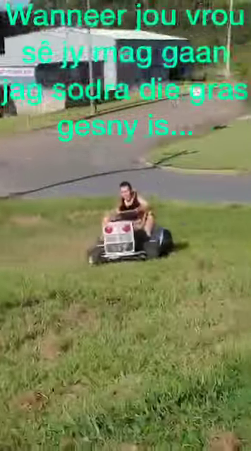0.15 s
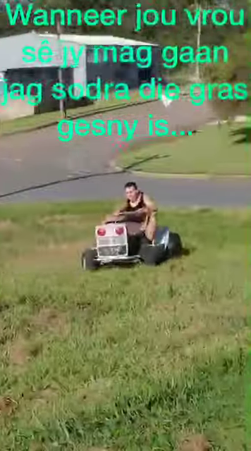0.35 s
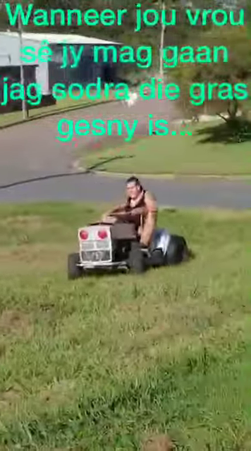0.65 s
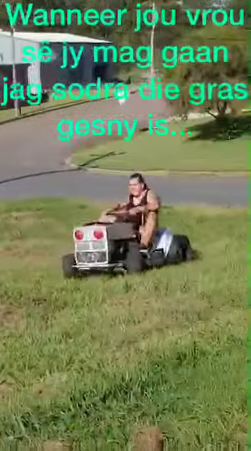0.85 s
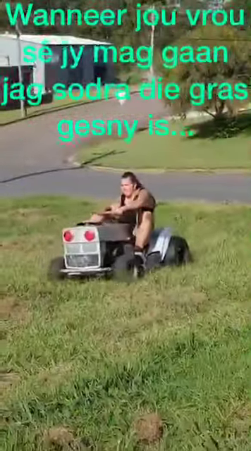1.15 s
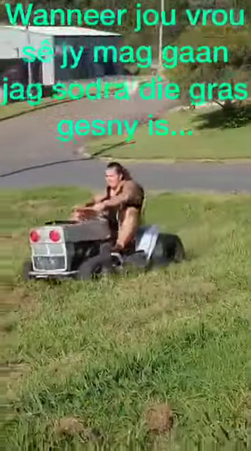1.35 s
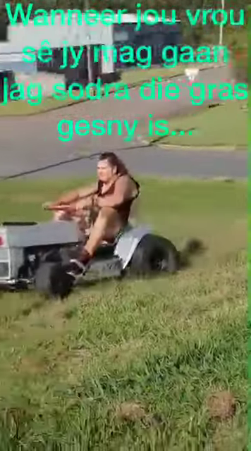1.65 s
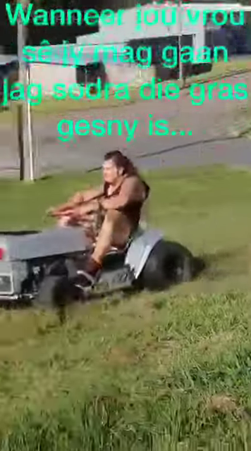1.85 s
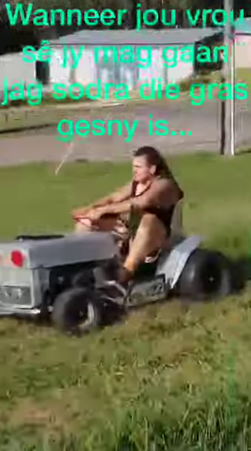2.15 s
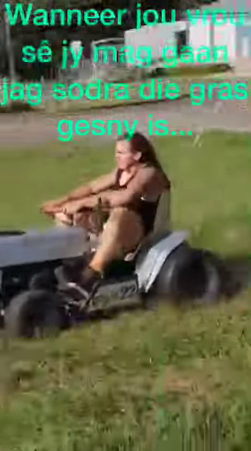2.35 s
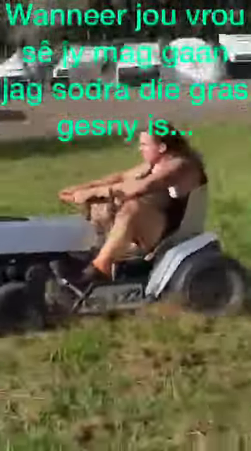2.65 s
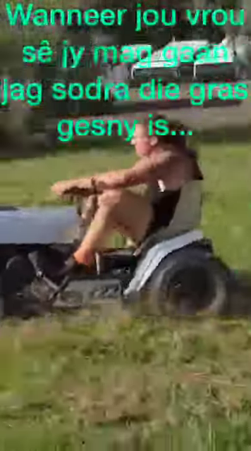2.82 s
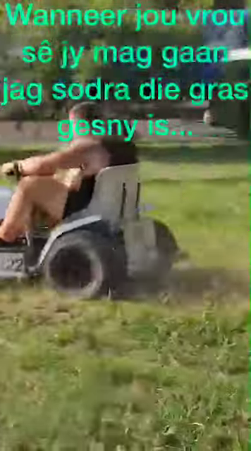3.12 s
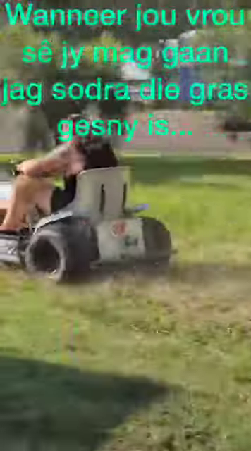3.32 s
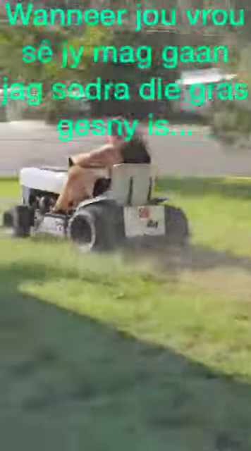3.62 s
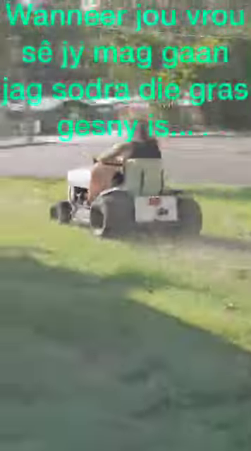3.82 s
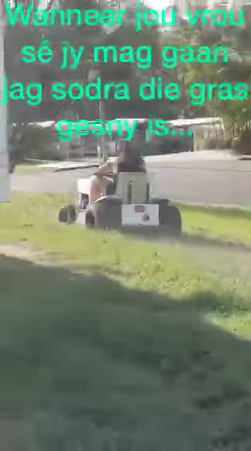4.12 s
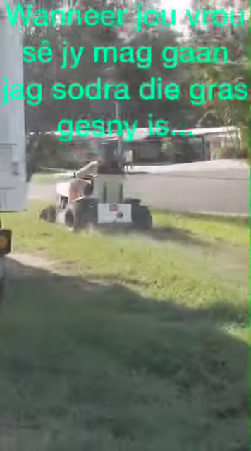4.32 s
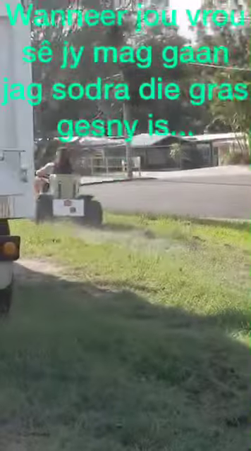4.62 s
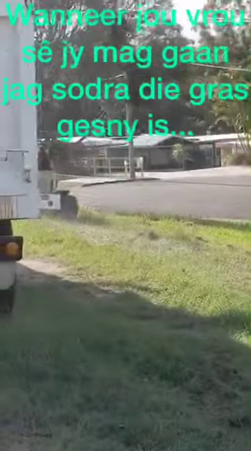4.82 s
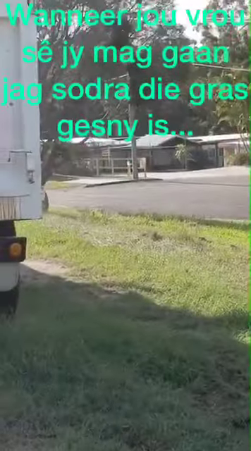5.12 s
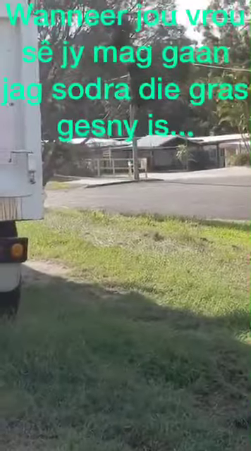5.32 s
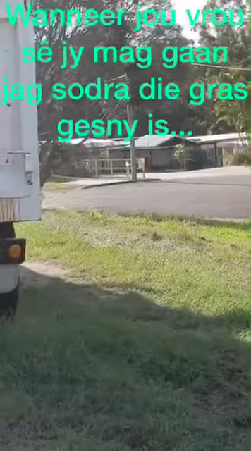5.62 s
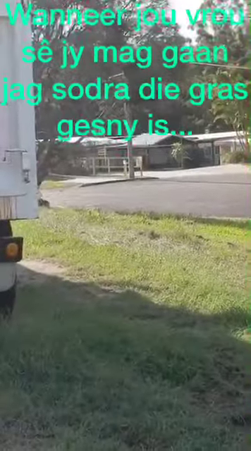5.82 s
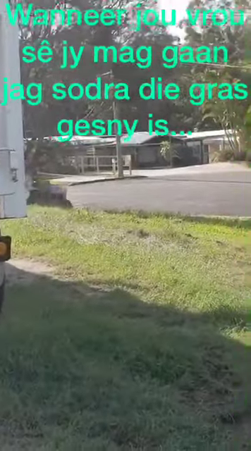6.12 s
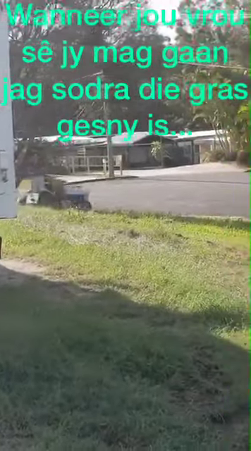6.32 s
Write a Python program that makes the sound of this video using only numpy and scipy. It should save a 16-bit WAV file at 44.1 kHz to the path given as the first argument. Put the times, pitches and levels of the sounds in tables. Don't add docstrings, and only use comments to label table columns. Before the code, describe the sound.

A buzzing, barking small engine races beyond a parked truck, muffled and echo-scattered, briefly clearer and crackling near the middle. Popping misfires mark each throttle change. After the second pull it falls to a lower stuttering drone and recedes, leaving faint yard murmur, two tiny snaps, gliding high bird chirps and a stronger final gust on the handheld microphone.

```python
import sys
import numpy as np
from scipy import signal
from scipy.io import wavfile
from scipy.ndimage import uniform_filter1d

SR = 44100
rng = np.random.default_rng(int(sys.argv[2]) if len(sys.argv) > 2 else 0)


def amplitude_ratio(level_db):
    exponent = np.asarray(level_db, float) / 20
    return 10 ** exponent


def waveform_to_disk(signal):
    frames = np.transpose(np.atleast_2d(signal))
    scaled = np.clip(frames, -1, 1) * 32767
    samples = np.round(scaled).astype(np.int16)
    wavfile.write(sys.argv[1], SR, samples)


N = 285327
STEP = 64

# time in seconds, clearness from 0 to 1.
CLEARNESS = [(.9, .08), (1.15, .3), (1.3, .05), (1.8, .05), (2.2, .14), (2.7, .52), (3.12, .63),
             (3.27, .85), (3.32, .08)]


def evened(x):
    return x / np.sqrt(np.mean(x ** 2) + 1e-20)


def read(points, hz):
    f, value = np.transpose(points)
    return np.interp(np.log(hz + 1), np.log(f + 1), value)


def columns(rows, step=1):
    s, *rest = np.transpose(rows)
    return [np.interp(np.arange(0, N, step) / SR, s, c) for c in rest]


def add(mix, s, sound):
    part = mix[round(s * SR):][:len(sound)]
    part += sound[:len(part)]


def drift(hz, step=1):
    points = rng.standard_normal(800)
    return np.interp(np.arange(0, N, step) * hz / SR, np.arange(800), points) * 1.367


def noise(points, patchy_db):
    frames, hz = N // 256 + 5, np.fft.rfftfreq(1024, 1 / SR)
    a, b, patches = rng.standard_normal((frames, 513, 3)).T
    patches = uniform_filter1d(patches, size=10, axis=0)
    patches = evened(uniform_filter1d(patches, size=12, axis=1))
    z = (a + 1j * b) * amplitude_ratio(read(points, hz)[:, None] + patchy_db * patches)
    return evened(signal.istft(z, nperseg=1024, noverlap=768)[1][:N])


def speed():
    # time in seconds, firing rate in Hz.
    revs = [(0.0, 348.5), (0.39, 370.7), (1.121, 415), (1.311, 378.6), (1.451, 250.2), (1.776, 270.4),
            (1.975, 316.6), (3.279, 370.5), (3.389, 299.1), (3.766, 248), (4.412, 259.9), (4.794, 218.2),
            (5.034, 224.2), (5.196, 210.3), (5.666, 159.4), (5.93, 169.1), (6.357, 198.5), (6.47, 177.2)]
    # start in seconds, drop in Hz, fall in seconds, recovery in seconds.
    sags = [(0.16, 10.5, 0.232, 0.051), (0.595, 25.1, 0.103, 0.128), (0.786, 25.7, 0.164, 0.306),
            (1.23, 17.7, 0.106, 0.185), (1.991, 23.4, 0.081, 0.173), (2.295, 30.6, 0.087, 0.175),
            (2.549, 22.3, 0.12, 0.226), (2.675, 16.7, 0.135, 0.32), (3.065, 14.5, 0.046, 0.139),
            (3.391, 10.5, 0.091, 0.075), (3.975, 12.3, 0.177, 0.13), (4.44, 23.9, 0.135, 0.21),
            (4.7, 27.4, 0.174, 0.171), (5.205, 12.6, 0.154, 0.09), (5.644, 34.0, 0.187, 0.215),
            (5.886, 4.4, 0.055, 0.15)]
    t = np.arange(N) / SR
    dips = sum(hz * np.interp(t - s, [0, fall, fall + back], [0, 1, 0]) for s, hz, fall, back in sags)
    return columns(revs)[0] - dips


def throttle():
    # start in seconds, end in seconds.
    held_open = [
        (-1, 1.28),
        (1.47, 3.285),
        (3.84, 4.47),
        (4.91, 5.235),
        (5.97, 6.41),
    ]
    open_upper_db = [1.9, 1.1, 7.5, 4.4, 2.4]
    open_tone_db = [0.5, -0.17, -3.5, -3, 5.5]
    stumbles = [1.294, 3.3, 4.465, 4.567, 4.622, 4.695, 4.772, 4.885, 5.235, 5.69, 5.735, 5.78, 5.84, 5.905,
                5.935, 6.415]
    snap_s, stumble_db, stumble_s = .03, -9, .007
    hunt_s, hunt_width_s, hunt_per_s, hunt_db = 3.595, .19, 9.3, 2.8
    t = np.arange(N) / SR
    held = np.array([np.clip(np.minimum(t - start, end - t) / snap_s + .5, 0, 1)
                     for start, end in held_open])
    upper_db, tone_db = np.array([open_upper_db, open_tone_db]) @ held
    hunt = np.cos(2 * np.pi * hunt_per_s * (t - hunt_s)) * np.exp(-((t - hunt_s) / hunt_width_s) ** 4)
    missed = sum(np.exp(-((t - s) / stumble_s) ** 2) for s in stumbles)
    return upper_db, tone_db + hunt_db * hunt + stumble_db * missed


def effort():
    # time in seconds, effort in dB, imbalance of the two firings in dB,
    # sharpness of the pulse in dB, muffled share in dB.
    drive = [(0, -21, -5.5, -3.5, -15.5), (.55, -15.5, -9.5, -10.5, -23.5), (1.2, -16, -1, 4.5, -20),
             (1.31, -21, -1.5, -10.5, -17.5), (1.45, -15.5, -4.5, -14.5, -15.5),
             (2.07, -8.5, -11, -7.5, -16), (2.56, -10, -9.5, -8, -27.5), (2.92, -21, -1.5, -1, -22),
             (3.24, -14, -15, -2, -29), (3.4, -19.5, -5, -15.5, -21), (3.7, -19, -2.5, -1.5, -16),
             (4.12, -24, -3.5, -10.5, -9.5), (4.3, -17, -9.5, -7.5, -15), (4.88, -21, -10, -11.5, -12),
             (5.37, -17.5, -12.5, -12.5, -13.5), (5.85, -33.5, -6, -8, -8), (6.06, -26.5, -17, -6, -11),
             (6.36, -26.5, -6.5, 2, -11)]
    pull_db, pull_hz_per_s = 1, 450
    effort_db, imbalance_db, sharp_db, muffled_db = columns(drive)
    climb = uniform_filter1d(np.gradient(speed()) * SR, size=2000)
    upper_db = throttle()[0]
    effort_db = effort_db + pull_db * np.tanh(climb / pull_hz_per_s)
    return effort_db, imbalance_db, sharp_db + upper_db, muffled_db + upper_db


def crank():
    return np.pi * np.cumsum(speed() * (1 + 0.00318 * drift(hz=59.75))) / SR


def drone(angle):
    # frequency in Hz, gain in dB.
    silencer = [(85, -18.5), (130, -8), (170, 2.5), (300, 1), (345, -4.5), (400, -4.5), (520, -11),
                (790, -9.5)]
    hz, (effort_db, imbalance_db, sharp_db, _) = speed(), effort()
    half_db = effort_db + imbalance_db + read(silencer, hz / 2)
    main_db = effort_db + throttle()[1] + read(silencer, hz)
    twice_db = effort_db + sharp_db + read(silencer, 2 * hz)
    lope_db = -22.5 + 0.93 * effort_db
    out = amplitude_ratio(half_db + 1.3 * drift(hz=25.07)) * np.cos(angle)
    out += amplitude_ratio(main_db + 1.4 * drift(hz=40)) * np.cos(2 * angle)
    out += amplitude_ratio(twice_db + 1.7 * drift(hz=30)) * np.cos(4 * angle)
    for order, db in [(.75, -3), (1.25, -9)]:
        out += amplitude_ratio(lope_db + db + 3.0 * drift(hz=20)) * np.cos(2 * order * angle + order)
    return np.sqrt(2) * out


def scatter_of(sight):
    echo_share = [(.5, .62), (.65, .11)]
    return np.interp(sight, *np.transpose(echo_share))


def stack(angle, layers, count):
    hz, scatter = speed()[::STEP], scatter_of(columns(CLEARNESS, step=STEP)[0])
    orders = np.array([3, *range(5, count)])[:, None]
    power = 0
    for shape_db, level, uneven_db in layers:
        share = amplitude_ratio(shape_db(orders * hz / 2) + uneven_db[::STEP] * (orders % 2)) ** 2
        power = power + 2 * share / share.sum(axis=0) * level[::STEP] ** 2
    out = np.zeros(N)
    for k, gain in zip(orders[:, 0], np.sqrt(power)):
        gain = gain * amplitude_ratio(min(1.2 + k / 6, 2.7) * drift(hz=10, step=STEP) - .9)
        lag = scatter * 2.2 * drift(hz=.8, step=STEP)
        lag = lag + (k / 29) ** 2 * drift(hz=110, step=STEP)
        phase = k * angle + np.repeat(lag + k % 2, STEP)[:N]
        out += np.repeat(gain, STEP)[:N] * np.cos(phase)
    return out


def pipe(angle):
    # frequency in Hz, level in dB.
    growl = [(450, -2.5), (600, 4.5), (750, 2), (900, -10), (1100, -41)]
    # frequency in Hz, level in dB.
    bark = [(700, -15.5), (950, -12.5), (1500, -11), (1750, -14), (2400, -18.5), (2800, -20), (3400, -26.5)]
    # frequency in Hz, level in dB.
    edge = [(1200, -20), (1800, -3), (2400, -1), (2850, 0), (3300, -4), (3700, -12), (4500, -7), (5200, -6),
            (6200, -14)]
    # time in seconds, blast in dB, share of bark in dB, pipe resonance in Hz.
    aim = [(0, -28, -10.5, 1100), (.3, -25.5, -3.5, 1030), (1.22, -21, -5.5, 1200),
           (1.45, -29.5, -12, 1240), (1.52, -28.5, 2, 1170), (2.0, -22.5, 4.5, 1170),
           (2.65, -24.5, 9.5, 985), (2.83, -24, 10, 1320), (3.1, -27.5, 7.5, 1595), (3.26, -25, 9.5, 1470),
           (3.32, -35, 2.5, 1390), (3.6, -37, -2.5, 1320), (3.82, -38.5, -14, 970), (4.11, -50.5, 2.5, 910),
           (4.38, -40.5, -9.5, 960), (5.2, -48.5, 1.5, 1100), (5.65, -53.5, 2, 1194), (6.23, -46, -4, 1050)]
    rough, bark_peak_db, bark_width_hz = .14, 8, 320
    effort_db, imbalance_db, _, muffled_db = effort()
    hiss_db, bark_db, bark_hz = columns(aim)
    upper_db = throttle()[0]
    growl_level = amplitude_ratio(effort_db + muffled_db)
    bark_level = amplitude_ratio(hiss_db + bark_db + 0.95 * upper_db)
    hiss_level = amplitude_ratio(hiss_db + 0.47 * upper_db)
    crack = columns(CLEARNESS)[0]
    scatter = scatter_of(crack)
    uneven_db = -4.5 - .1 * np.maximum(speed() - 330, 0) * (1 - crack)
    puffs = evened(1 + .38 * np.cos(2 * angle) + .12 * np.cos(angle))
    direct_db = 28 * np.maximum(.4 - scatter[::STEP], 0)
    shade_db = 9 * np.maximum(.6 - crack[::STEP], 0)

    def growl_shape(f):
        return read(growl, f)

    def bark_shape(f):
        peak = np.exp(-((f - bark_hz[::STEP]) / bark_width_hz) ** 2)
        return read(bark, f) + bark_peak_db * peak - shade_db * (f > 1700)

    def edge_shape(f):
        return read(edge, f) + direct_db * (f > 3900)

    smooth = np.sqrt(1 - rough)
    tones = stack(angle, [(growl_shape, growl_level * smooth, -3 + 0.6 * imbalance_db),
                          (bark_shape, bark_level * smooth, uneven_db),
                          (edge_shape, hiss_level * np.sqrt(crack), uneven_db)], count=36)
    growl_air = noise([(300, -40.5)] + growl + [(1400, -30)], 0.53)
    bark_air = noise([(500, -60)] + bark + [(6000, -75)], 2.5)
    tones += growl_level * np.sqrt(rough) * puffs * growl_air
    tones += bark_level * np.sqrt(rough) * (1 - .5 * crack) * puffs * bark_air
    return tones, hiss_level * puffs * np.sqrt(1 - 0.37 * crack)


def hiss(level):
    # frequency in Hz, level in dB per Hz.
    jet = [(900, 4), (1500, -0.5), (2200, -1), (2850, 6), (3600, 2.5), (4900, 2.5), (6700, 0), (7600, -3.5),
           (8200, -12.5), (10500, -10), (12100, -17.5), (13000, -68)]
    return level * noise([(500, -34)] + jet, 2.25)


def scattered_air(hiss_level):
    # frequency in Hz, level in dB per Hz.
    side_air = [(200, -19), (400, -25), (783, -4), (1450, -49), (2420, -11.5), (3500, -14.5), (4720, -15.5),
                (7170, -13), (10000, -21.5), (12100, -20), (13000, -66)]
    return (hiss_level + amplitude_ratio(-42)) * noise(side_air, 0.77) * amplitude_ratio(-7.5)


def yard():
    # frequency in Hz, level in dB per Hz.
    murmur = [(25, -46.5), (120, 4.5), (277, 4.5), (454, -7), (822, -15.5), (1610, -18), (2000, -25),
              (3900, -27), (5200, -36), (7000, -38), (9600, -27.5), (12100, -38.5), (13000, -92)]
    return amplitude_ratio(-32) * noise(murmur, 2.)


def wind():
    # centre in seconds, level in dB, width in seconds.
    gust_rows = [
        (.5, -39, 0.55),
        (1.499, -38.5, 0.49),
        (4.05, -41.5, 0.55),
        (6.4, -32, .95),
    ]
    shape = [(20, 0.5), (45, 9.5), (90, 7), (140, 9.5), (260, -19.5), (500, -85)]  # Hz, dB
    common, apart = noise(shape, 0.83), noise(shape, 2.5)
    t = np.arange(N) / SR
    gusts = sum(amplitude_ratio(db) * np.exp(-((t - s) / width) ** 2) for s, db, width in gust_rows)
    return gusts * (common + 0.88 * np.outer([1, -1], apart))


def pops():
    # start in seconds, peak in dB, ring in Hz, 60 dB decay in seconds.
    misfires = [(1.276, -2, 169, 0.057), (1.449, 3, 200, 0.019), (1.461, -8.5, 177, 0.096),
                (3.275, -6, 195, .04), (3.286, -5.5, 199, 0.041), (3.834, -8.5, 155, 0.065),
                (3.853, -9.5, 160, 0.04), (3.866, -14, 159, 0.18), (3.884, -15, 159.4, 0.037),
                (3.9, -12, 162, .06), (4.469, -9, 178, 0.045), (4.884, -24, 160.6, .04)]
    out, t = np.zeros(N), np.arange(4000) / SR
    for s, db, hz, t60 in misfires:
        ring = amplitude_ratio(db - 60 * t / t60) * np.sin(2 * np.pi * hz * t)
        add(out, s, ring * np.minimum(t / .003, 1))
    return signal.sosfilt(signal.butter(2, 110, "high", fs=SR, output="sos"), out)


def snaps():
    # start in seconds, level in dB.
    ticks = [
        (4.68, -35),
        (4.959, -33),
    ]
    out, t = np.zeros(N), np.arange(4000) / SR
    for s, db in ticks:
        add(out, s, amplitude_ratio(db - 60 * t / 0.067) * rng.standard_normal(len(t)))
    return out


def birds():
    # start in seconds, length in seconds, start in Hz, end in Hz, level in dB.
    chirp_rows = [(4.79, .15, 5050, 5300, -42), (5.17, .05, 4800, 4650, -46), (5.22, .09, 5150, 5000, -41),
                  (5.23, .23, 5650, 4950, -48), (5.2, .25, 3150, 3000, -49), (5.62, .2, 2900, 3250, -49),
                  (5.82, .14, 3300, 3900, -44), (5.87, .07, 7200, 7850, -45), (5.66, .03, 6000, 6150, -50),
                  (6.13, .06, 7000, 7100, -42), (6.18, .05, 4500, 4100, -45), (6.2, .07, 5300, 5200, -44),
                  (6.35, .08, 7100, 7050, -46)]
    arch_per_s = .3
    out = np.zeros(N)
    for s, length, start_hz, end_hz, db in chirp_rows:
        u = np.linspace(-1, 1, round(length * SR))
        arch = 1 + arch_per_s * length * (1 - u ** 2) * (start_hz > 3250)
        hz = (start_hz + end_hz) / 2 * arch + (end_hz - start_hz) / 2 * u
        phase = 2 * np.pi * np.cumsum(hz + 50 * drift(hz=90.0)[:len(u)]) / SR
        add(out, s, amplitude_ratio(db) * np.sin(phase) * np.sqrt(1 - u ** 2))
    return out * amplitude_ratio(3.5 * drift(hz=80) - 3.3)


def scene():
    angle = crank()
    tones, hiss_level = pipe(angle)
    engine = drone(angle) + tones + hiss(hiss_level) + pops() + snaps()
    loud_db = 10 * np.log10(abs(uniform_filter1d(engine ** 2, size=9000)) + 1e-9)
    duck = amplitude_ratio(-.35 * (loud_db + 25))
    delay = (np.roll(tones, 5) - np.roll(tones, -5)) * amplitude_ratio(-12.0)
    side = np.outer([1, -1], scattered_air(hiss_level) + delay)
    chirps = birds() * amplitude_ratio([[2.5], [-2.5]])
    return engine + yard() * duck + chirps + side + wind() * np.sqrt(duck)


def starve(x, kept, weak_db):
    hz, t, z = signal.stft(x, SR, nperseg=1024, noverlap=768)
    band = (np.minimum(hz / 5000, 1) * 4 + hz / 560).astype(int)
    chance = rng.standard_normal((band.max() + 1, len(t) // 4 + 1))
    chance = uniform_filter1d(chance, size=4, axis=1)
    power = abs(z) ** 2
    share_db = 10 * np.log10(power[hz > 3000].sum(0) / (power.sum(0) + 1e-9 * 0) + 1e-9)
    share_db = share_db[::4][:chance.shape[1]]
    chance[:, :len(share_db)] -= .06 * (share_db - uniform_filter1d(share_db, size=70))
    rank = np.argsort(np.argsort(chance, axis=1), axis=1) / chance.shape[1]
    centre = np.bincount(band, hz) / np.bincount(band)
    alive = (rank < read(kept, centre)[:, None])[band][:, np.arange(len(t)) // 4]
    spot = uniform_filter1d(uniform_filter1d(power, size=2, axis=0), size=8, axis=1)
    around = np.exp(uniform_filter1d(np.log(spot + 1e-20), size=24, axis=0))
    alive &= (spot > amplitude_ratio(weak_db) ** 2 * around) | (hz < 2300)[:, None]
    return signal.istft(z * alive, SR, nperseg=1024, noverlap=768)[1][:N]


def roll_off(x):
    return signal.sosfilt(signal.butter(12, 12280, fs=SR, output="sos"), x)


def record(dry):
    # frequency in Hz, share of time from 0 to 1.
    kept_mid = [(5200, 1.01), (5700, .95), (6900, .92), (7500, .55), (8100, .15), (9000, .25), (10300, .45),
                (11300, .25), (12200, .05)]
    # frequency in Hz, share of time from 0 to 1.
    kept_side = [(300, .9), (1000, .7), (1300, .5), (2500, .85), (3300, .3), (4100, .15), (4800, .6),
                 (5600, .06), (6500, .15), (7300, .65), (8800, .45), (10000, .85), (12200, .65)]
    knee, lean_db = .62, .25
    over = np.maximum(abs(dry) - knee, 0)
    limited = np.clip(dry, -knee, knee) + np.sign(dry) * .2 * np.tanh(over / .2)
    left, right = signal.sosfilt(signal.butter(2, 35, "high", fs=SR, output="sos"), limited)
    mid = starve((left + right) / 2, kept_mid, weak_db=-3.2)
    side = starve((left - right) / 2, kept_side, weak_db=-2.5)
    return roll_off(np.array([mid + side, mid - side]) * amplitude_ratio([[lean_db], [-lean_db]]))


dry = scene()
out = record(dry)
waveform_to_disk(out)
```